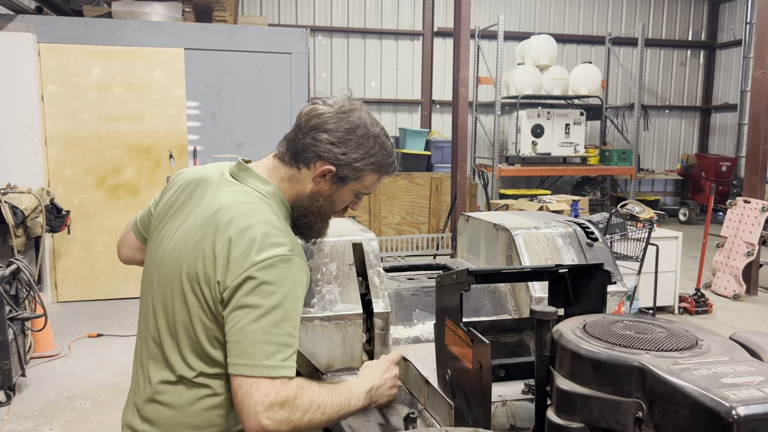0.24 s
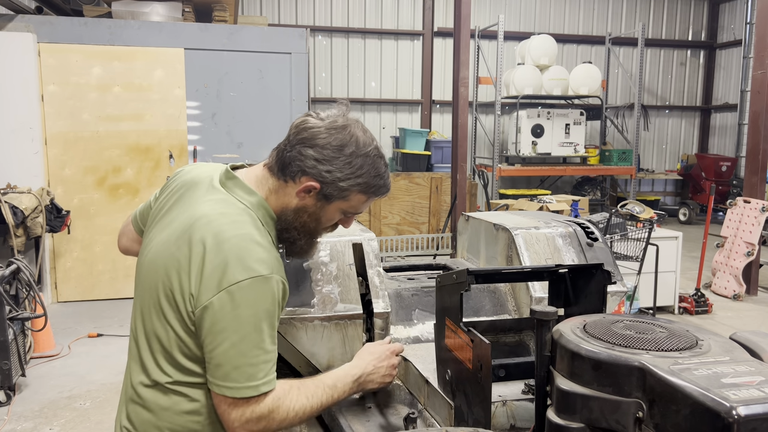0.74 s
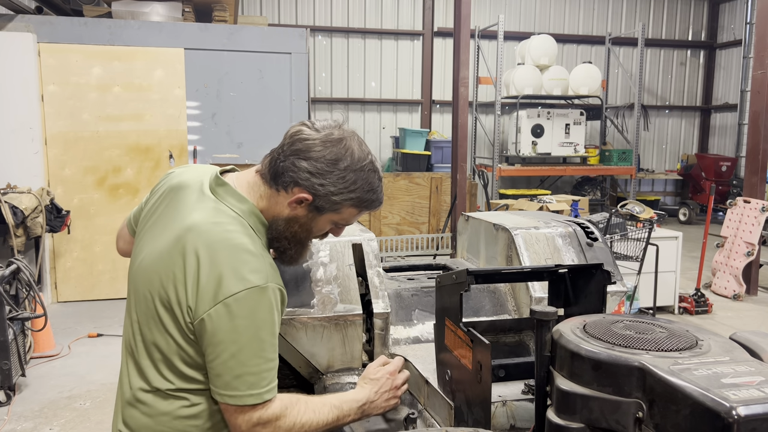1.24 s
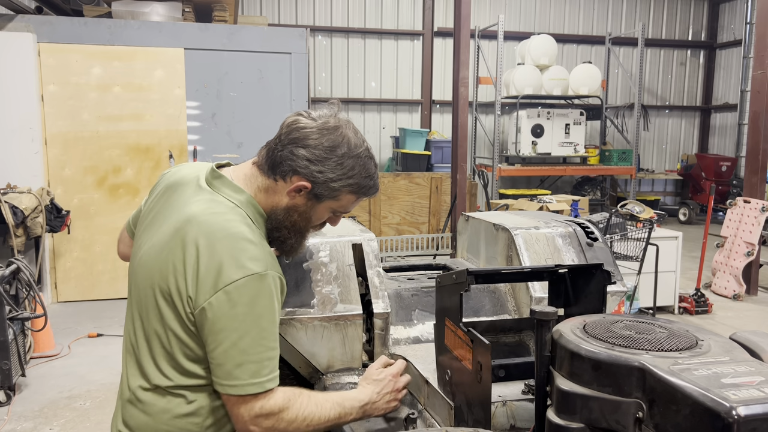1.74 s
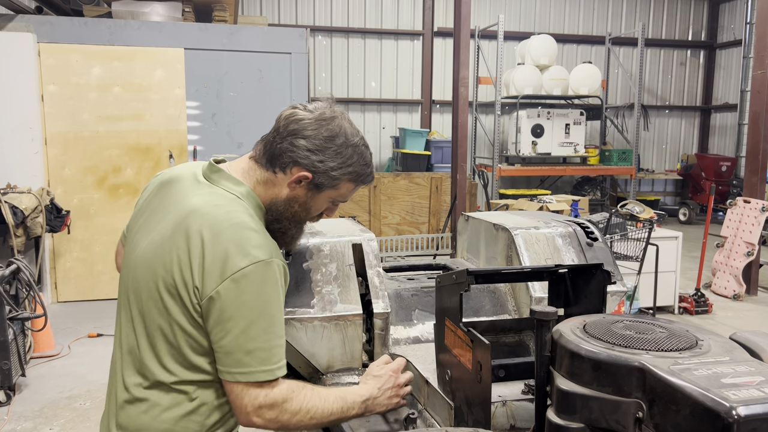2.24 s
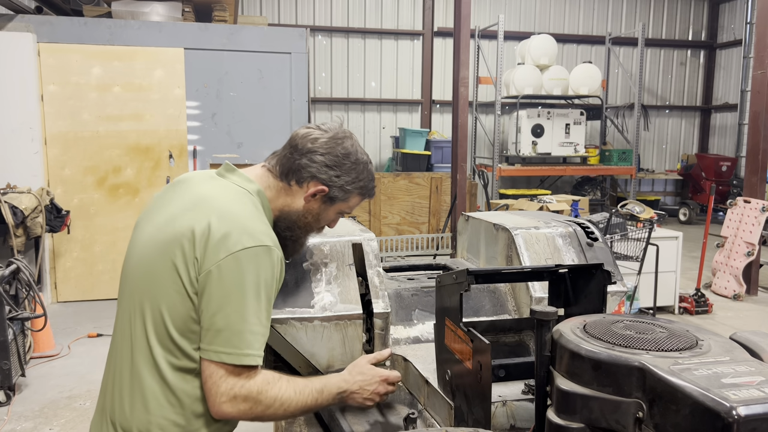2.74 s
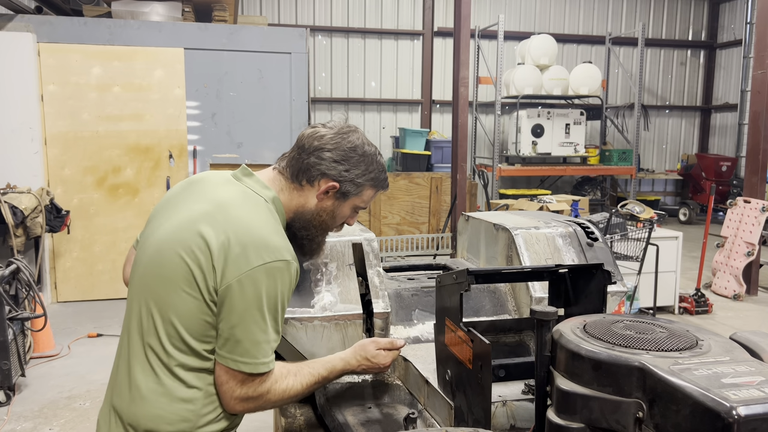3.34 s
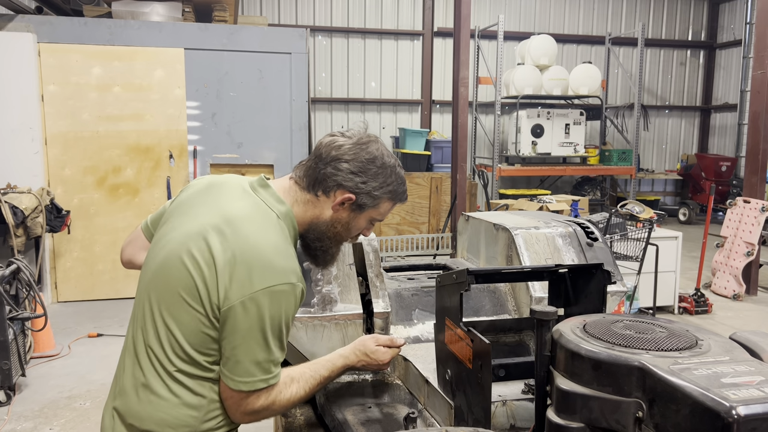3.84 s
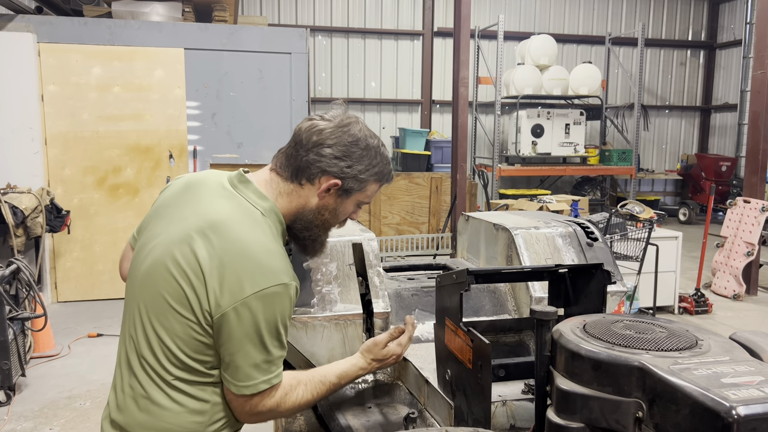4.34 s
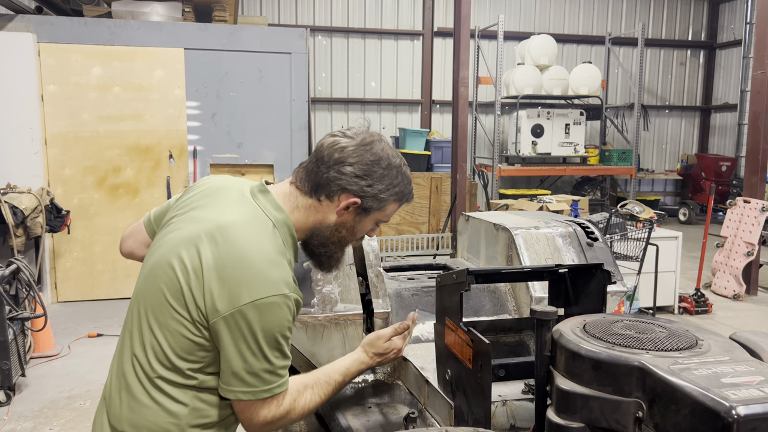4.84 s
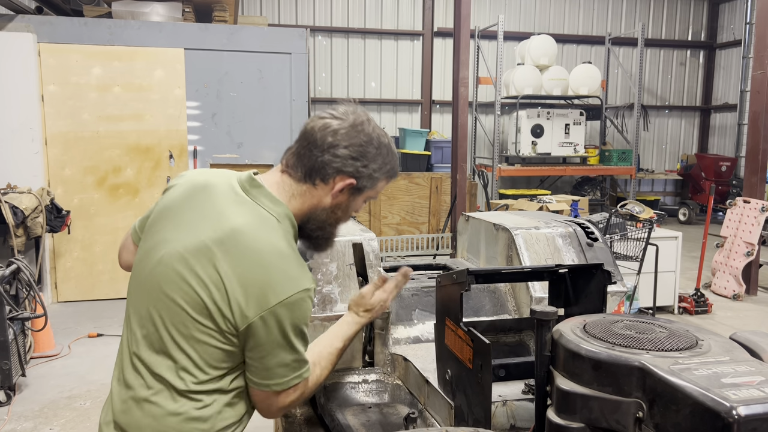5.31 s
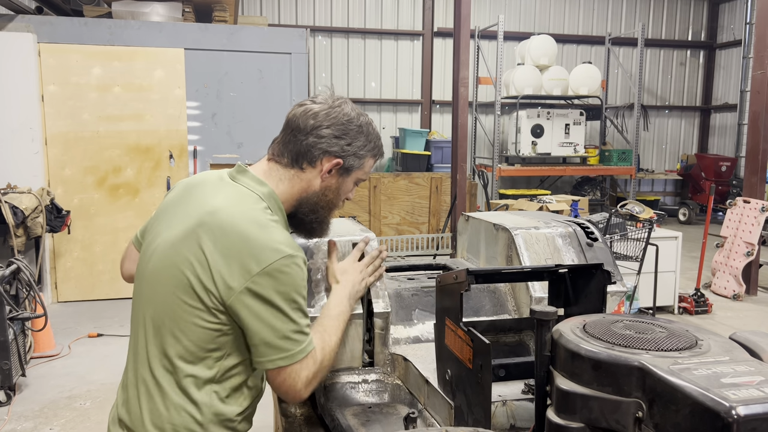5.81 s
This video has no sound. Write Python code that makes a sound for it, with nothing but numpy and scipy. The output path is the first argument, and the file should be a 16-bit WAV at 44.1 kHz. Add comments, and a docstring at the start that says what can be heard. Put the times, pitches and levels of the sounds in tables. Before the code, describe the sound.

A low, slightly wavering ventilation rumble with faint hum fills a large sheet-metal workshop. At about 0.1 s a steel lever slams its frame: an extremely loud, clipped, dry clank with a tiny high pin jingle, its echo fading over most of a second. Small dull knocks and a brief scrape follow at 0.65-0.9 s, a fainter one near 1.1. Crisp, bright snaps into the gate come at 1.7 and 2.15 s, a softer one at 2.95, with faint ticks between. Barely audible rubbing leads to a click at 4.0 s and a duller clunk at 4.27, with a slight jingle. After a quieter gap, knocks resume at 4.95 s and build to a fast, gritty clatter with a low thump at 5.2-5.3 s. A muffled knock at 5.55, a rub, and a strong clunk with jingle at 5.75 end it, with one last small knock at 5.9.

```python
"""A steel gear lever is pushed through its gates on a machine frame in a large sheet-metal workshop.
Knocks and snaps are bursts of chattering contacts that ring the frame and gate plate; a loose pin jingles.
The lever rubs along its slot as gritty noise; one such noise, below 140 Hz, is a low thump of the frame.
Fading noise makes the echoes of the hall; shaped noise and wavering tones make the ventilation.
One microphone adds faint hiss, clips at full scale and cuts the highest treble."""
import sys
import numpy as np
from scipy import signal
from scipy.fft import rfft, irfft
from scipy.io import wavfile
from scipy.ndimage import uniform_filter1d

SR = 44100
rng = np.random.default_rng(int(sys.argv[2]) if len(sys.argv) > 2 else 0)


def generate_wav(sig):
    """Save sig (samples, or channels by samples) to the path in sys.argv[1] as 16-bit PCM at SR."""
    pcm = np.round(np.clip(np.atleast_2d(sig).T, -1, 1) * 32767).astype(np.int16)
    wavfile.write(sys.argv[1], SR, pcm)


N = 267687  # length of the scene in samples

SPLIT = 0.03  # welded, worn steel: each mode is a bunch of close partials, spread as a share of its pitch


def undb(db):
    """Turn a level in dB into a gain."""
    return 10 ** (np.asarray(db) / 20)


def band(x, lo_hz, hi_hz):
    """Keep mainly the sound between two frequencies, with a filter that never looks ahead."""
    sos = signal.butter(2, [lo_hz, hi_hz], "bandpass", fs=SR, output="sos")
    return signal.sosfilt(sos, x)


def walk(rate_hz):
    """Wander randomly around 0: levels held 1 / rate_hz seconds, then smoothed twice; spread near 1."""
    hold = int(SR / rate_hz)
    steps = np.repeat(rng.standard_normal(N // hold + 1), hold)
    smooth = uniform_filter1d(uniform_filter1d(steps, hold), hold)
    return 1.3 * smooth[:N]


def add(out, start_s, sound):
    """Mix a sound in at start_s seconds, with its last fifth faded out."""
    fade_out = np.minimum(1, np.linspace(5, 0, len(sound)))
    out[int(start_s * SR):][:len(sound)] += sound * fade_out


def lever():
    """The moving lever knocks the frame, snaps into gates and now and then jingles the pin."""
    return knocks() + snaps() + pin()


def knocks():
    """Knocks on the machine frame: chattering contacts that make its steel ring."""
    # Knocks. Each row: start in seconds, level in dB, bass weight in dB,
    # treble slope in dB per octave, chatter in ms (for a band that starts at 900 Hz).
    blow_rows = [(0.0441, -34, 3.5, -2.5, 22), (0.0807, -18, -4, -2, 22), (0.135, 5.5, -6, -6.5, 13),
                 (0.217, -29.5, 13, 2.5, 6.2), (0.2524, -36, 1.5, 3, 14), (0.664, -34, -6, -5, 17),
                 (0.674, -27, -3, -8, 17.3), (0.696, -44, -4, -1.5, 7.6), (0.7134, -26.5, 0, -12.5, 21.6),
                 (0.86, -51.5, 18, 1.5, 11), (0.8683, -30, -6, -9, 12), (1.075, -33, 2, -19.5, 12),
                 (1.2693, -57, 1.5, -2.5, 11.8), (1.3687, -64.5, 8, 1.2, 27.7),
                 (1.6745, -47.5, -0.5, -6.5, 15), (2.069, -45.5, 4.5, -8, 27),
                 (2.4908, -56, -1.2, -0.9, 35), (2.839, -56.5, 6.5, -5.5, 12),
                 (3.0467, -37.5, 3.5, -9, 14.6), (3.222, -46, 7, -11, 28), (3.5909, -48.5, -3, -4, 14),
                 (3.7652, -59, 2.5, -2.5, 19), (3.836, -51.5, -11, -6, 27), (4.271, -17, -8, -14, 16),
                 (4.2981, -21.5, 5, -14, 6.2), (4.6414, -52, 12.5, -9, 15.3),
                 (4.6814, -57.5, 7.5, 2.5, 12.4), (4.8254, -61.5, 6.5, -4, 16.5),
                 (4.9329, -31.5, -4, -5, 19), (4.9739, -37, 4, -11, 20), (5.0383, -17.5, -8, -7, 21.7),
                 (5.0704, -28, 11, -17, 10.3), (5.1089, -37, 6, -3, 16), (5.1933, -13, -4.5, -4.5, 23),
                 (5.213, -12, -2, -4, 9.9), (5.233, -15.5, 3, -5, 9.9), (5.2537, -11, -5.8, -4, 14.6),
                 (5.2683, -27, 8.5, -2.5, 33), (5.2837, -14, 4, -1, 13.7), (5.3396, -37, 15.5, 3.5, 18),
                 (5.5347, -22, -10, -12, 8.5), (5.5656, -30, 2, -7, 16), (5.7453, -9, -10, -5, 11.5),
                 (5.7734, -19, 0, -10, 16), (5.882, -24.5, -6.5, -6, 12.6)]
    # Ringing modes of the frame. Each row: pitch in Hz, level in dB, time to fall by 60 dB in seconds.
    frame_modes = [(242.2, -5, 0.13), (355, 2.5, 0.086), (417.4, 0, 0.12), (489, 0, 0.11),
                   (559.5, -2.5, 0.25), (630, -3, 0.094), (770, -2.5, 0.077), (804.4, -1.5, 0.11),
                   (966, -0.5, 0.22), (999, -0.5, 0.32), (1120, 6, 0.026), (1350, -2.5, 0.041),
                   (1560, -9, 0.033), (1960, -12, 0.13), (2290, -3, 0.045)]
    # What all knocks share: level of each band in dB, basic rise in ms, ring of the body in dB.
    knock_kind = [3, -1, 0.37, 4, 1, 3.5], 2, -15.5
    return hits(blow_rows, frame_modes, *knock_kind)


def snaps():
    """The lever snapping into a gate: chattering contacts that make the gate plate ring."""
    # Snaps. Each row: start in seconds, level in dB, bass weight in dB,
    # treble slope in dB per octave, chatter in ms (for a band that starts at 900 Hz).
    snap_rows = [(1.718, -17, -2.5, -8.5, 7.5), (2.151, -15.5, -1.5, -7, 8.7),
                 (2.958, -25, -5.5, -10.5, 14), (3.990, -25, -1, -8.5, 21.5), (4.245, -32, 3, -3.5, 18)]
    # Ringing modes of the gate plate. Each row: pitch in Hz, level in dB, time to fall by 60 dB in seconds.
    gate_modes = [(355, 3.5, 0.057), (425, -3, 0.15), (624, -5.5, 0.05), (791, -7.5, 0.017),
                  (1120, -17, 0.041), (1420, -11, 0.046), (1910, -3, 0.037), (2252, -4.5, 0.074),
                  (2750, 15.5, 0.015), (3027, 4.5, 0.038), (3475, -9.5, 0.036), (4540, 0, 0.035),
                  (4860, 3, 0.056), (5660, 7.5, 0.03), (8540, 13.5, 0.019), (9400, 5, 0.0082)]
    # What all snaps share: level of each band in dB, basic rise in ms, ring of the body in dB.
    snap_kind = ([1.5, 1.5, 3, 8, 5, 5], .3, -5)
    return hits(snap_rows, gate_modes, *snap_kind)


def hits(table, modes, colour_db, rise_ms, body_db):
    """Each hit is a dying burst of contacts, heard directly and through the modes of its body.
    The weight lifts or lowers the bass; a softer contact is duller and rises more slowly."""
    # Bands that make up a hit. Each row: lowest and highest frequency in Hz.
    hit_bands = [(190, 450), (450, 950), (950, 2000), (2000, 4000), (4000, 8000), (8000, 15000)]
    bass = np.array([1, 1, 0, 0, 0, 0])  # bands moved by the bass weight
    octaves = np.array([0, 0, 0, 1, 2, 3])  # how far each band lies up the treble slope
    soft_ms_per_db = 0.1374  # a duller contact pushes longer: rise added per dB of falling treble slope
    chatter_tilt = -0.25  # bass chatters longer: length goes as frequency to this power
    out = np.zeros(N + SR)
    ms = 1000 * np.arange(SR // 4) / SR
    for start_s, level_db, weight_db, slope_db, chatter_ms in table:
        hit = 0
        body = ring(modes, SPLIT)
        soft_rise_ms = rise_ms + soft_ms_per_db * max(-slope_db, 0)
        rise = 1 - np.exp(-ms / soft_rise_ms)
        bands_db = level_db + weight_db * bass + slope_db * octaves + colour_db
        for (lo_hz, hi_hz), db in zip(hit_bands, bands_db):
            decay_ms = chatter_ms * (lo_hz / 900) ** chatter_tilt
            fade = rise * np.exp(-ms / decay_ms)
            burst = band(contacts(len(ms)) * fade, lo_hz, hi_hz)
            ringing = signal.fftconvolve(burst, body)[:len(ms)]
            steel = burst + undb(body_db) * ringing
            # Give every band half the strength of its fade curve, then set its level.
            even = np.sqrt(np.sum(fade ** 2) / np.sum(steel ** 2)) / 2
            hit = hit + undb(db) * steel * even
        add(out, start_s, hit)
    return out[:N]


def contacts(count):
    """Noise with heavy tails: many small touches and a few hard ones."""
    grit = 0.24  # 0 = smooth hiss, larger = more separate spikes
    noise = rng.standard_normal(count)
    return noise * np.abs(noise) ** grit


def ring(modes, split):
    """Answer of an object to one tap, energy 1: dying partials, each tap finding them a little elsewhere."""
    # Seven close partials stand for each mode.
    hz, db, t60 = np.repeat(np.transpose(modes), 7, axis=1)[:, :, None]
    t = np.arange(SR // 4) / SR
    shift, sign = rng.standard_normal((2, len(hz), 1))
    wave = np.sin(2 * np.pi * hz * (1 + split * shift) * t) * np.sign(sign)
    decay = 1000 ** (-t / t60)  # down 60 dB after t60 seconds
    tap = np.sum(undb(db) * wave * decay, axis=0)
    return tap / np.sqrt(np.sum(tap ** 2))


def pin():
    """The small loose pin is tapped once per jingle; its partials spread far less than the frame's."""
    # Jingles. Each row: start in seconds, level in dB.
    jingle_rows = [(0.1355, -23), (0.862, -46), (3.992, -47), (4.2474, -36), (5.7453, -22)]
    # Ringing modes of the pin. Each row: pitch in Hz, level in dB, time to fall by 60 dB in seconds.
    pin_modes = [(8040, 0.5, 0.18), (12490, 1.3, 0.16), (13750, -4.5, .15)]
    out = np.zeros(N + SR)
    for start_s, db in jingle_rows:
        add(out, start_s, undb(db) * ring(pin_modes, SPLIT / 10))
    return out[:N]


def slides_and_thump():
    """The lever rubs along its slot as gritty noise; one row, below 140 Hz, is a low thump of the frame."""
    # Rubs and one low thump. Each row: start in seconds, end in seconds, level in dB,
    # lowest and highest frequency in Hz.
    slide_rows = [(0.635, 0.666, -50, 1240, 5000), (2.107, 2.165, -60, 610, 4600),
                  (2.897, 2.958, -62, 993, 4800), (3.556, 3.899, -71.5, 1520, 8900),
                  (4.94, 5.062, -49.5, 199, 2700), (5.207, 5.36, -27, 196, 3180),
                  (5.23, 5.316, -32, 49.5, 139), (5.688, 5.774, -36.5, 304, 2000)]
    out = 0
    t = np.arange(N) / SR
    for start, end, db, lo_hz, hi_hz in slide_rows:
        gritty = band(contacts(N), lo_hz, hi_hz) * undb(2.5 * walk(80))  # the level stutters
        swell = np.interp(t, [start, start + 0.0094, end - 0.01, end], [0, 1, 1, 0])
        out = out + undb(db) * swell * gritty / gritty.std()
    return out


def hall(x):
    """Diffuse echoes of the sheet-metal walls: noise that fades at its own speed in each half octave."""
    # How long the hall rings. Each row: frequency in Hz, time to fall by 60 dB in seconds.
    hall_t60 = np.array([(200, 1), (600, 0.76), (2000, 0.72), (6000, 0.83), (14000, 0.22)])
    echo_db, build_up_ms = -7, 2.67
    t = np.arange(SR) / SR
    tail = 0
    for hz in 125 * 2.0 ** np.arange(0, 7.1, 0.5):
        t60 = np.interp(np.log(hz), np.log(hall_t60[:, 0]), hall_t60[:, 1])
        noise = band(rng.standard_normal(SR), hz / 2 ** 0.25, hz * 2 ** 0.25)
        tail = tail + noise * 1000 ** (-t / t60)
    tail = tail * (1 - np.exp(-1000 * t / build_up_ms))  # the echoes build up
    tail = tail / np.sqrt(np.sum(tail ** 2))
    return signal.fftconvolve(x, undb(echo_db) * tail)[:N]


def air():
    """Ventilation: shaped noise that swells a little, with a few hum tones that waver."""
    # Colour of the rumble. Each row: frequency in Hz, relative level in dB per Hz.
    air_colour = np.array([(12, -23.5), (20, 2), (55, 0.5), (81, -6), (106, -2), (208, -11), (274, -8.5),
                           (334, -10.5), (383, -9), (521, -17), (791, -23), (1020, -28), (1540, -32),
                           (3280, -38.5), (15600, -56)])
    # Hum tones. Each row: middle pitch in Hz, middle level in dB rms.
    hum_rows = [(59.2, -64), (102.3, -62), (231.5, -58.5), (387.6, -63.5), (2169, -76)]
    rumble_db = -45.5  # rms
    hz = np.maximum(np.arange(N // 2 + 1) * SR / N, 1)
    colour = undb(np.interp(np.log(hz), np.log(air_colour[:, 0]), air_colour[:, 1]))
    rumble = irfft(rfft(rng.standard_normal(N)) * colour, N) * undb(walk(2.2))
    hum = 0
    for pitch_hz, db in hum_rows:
        level = undb(db + 3 * walk(4)) * np.sqrt(2)  # a sine peaks at root 2 times its rms
        phase = 2 * np.pi * np.cumsum(pitch_hz * (1 + 0.004 * walk(5))) / SR
        hum = hum + level * np.sin(phase)
    return undb(rumble_db) * rumble / rumble.std() + hum


def scene():
    """Lever, its echoes and the workshop air at one microphone."""
    steel = lever() + slides_and_thump()
    return (steel + hall(steel) + air())[None]


def record(dry):
    """The microphone adds faint hiss, clips at full scale and cuts the top."""
    hiss_db, top_hz = -89, 15720
    hiss = undb(hiss_db) * rng.standard_normal(N)
    clipped = np.clip(dry + hiss, -1, 1)
    cut = signal.ellip(10, 0.2, 80, top_hz, fs=SR, output="sos")  # steep low-pass
    return signal.sosfilt(cut, clipped)


dry = scene()
out = record(dry)
generate_wav(out)
```